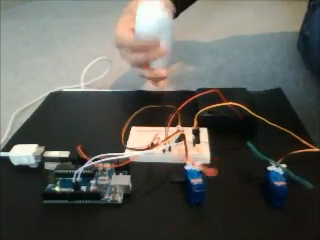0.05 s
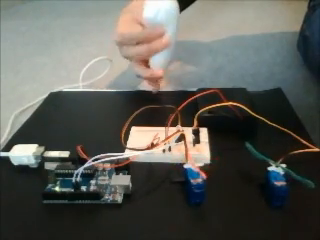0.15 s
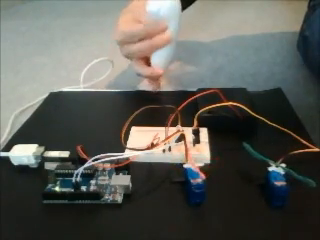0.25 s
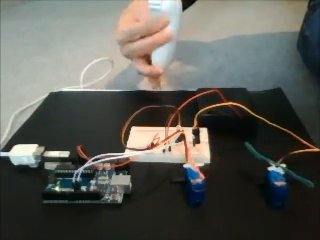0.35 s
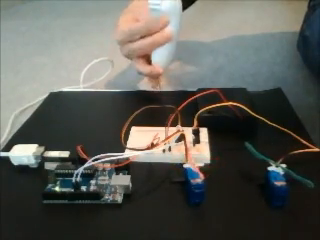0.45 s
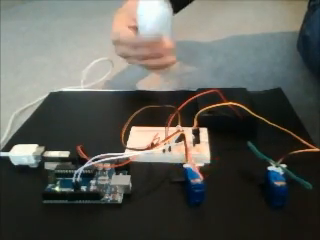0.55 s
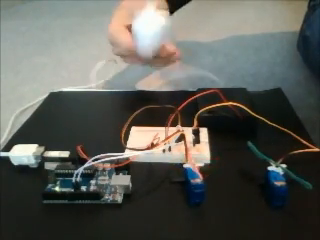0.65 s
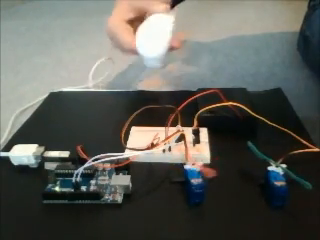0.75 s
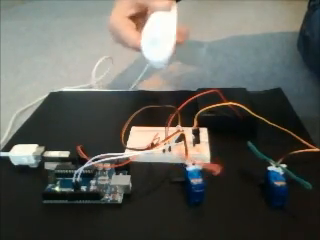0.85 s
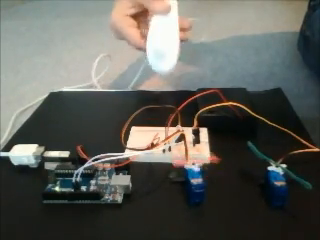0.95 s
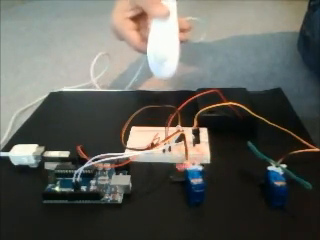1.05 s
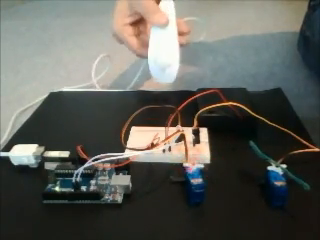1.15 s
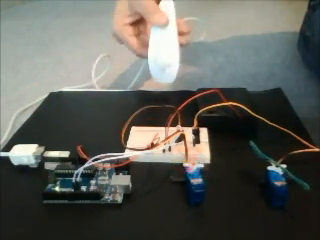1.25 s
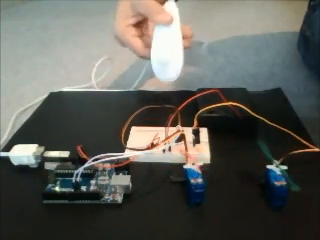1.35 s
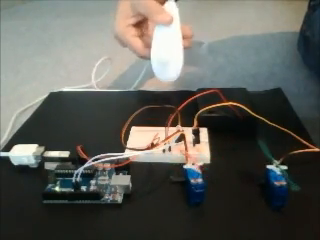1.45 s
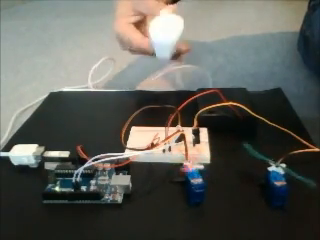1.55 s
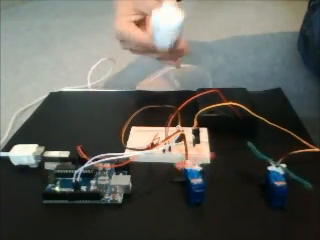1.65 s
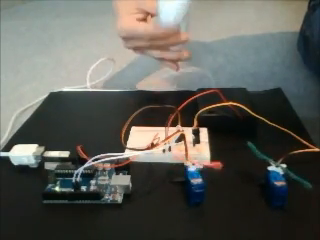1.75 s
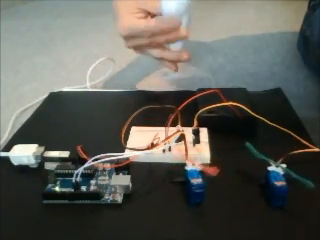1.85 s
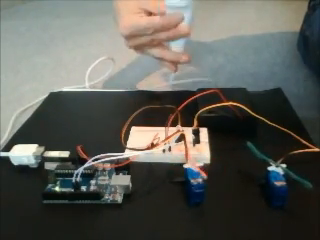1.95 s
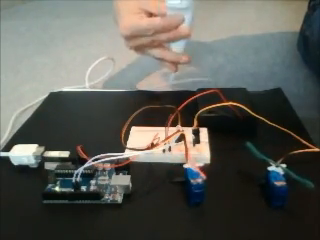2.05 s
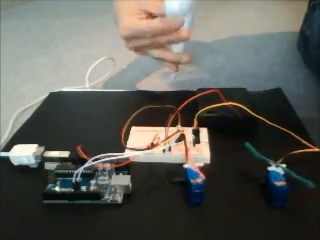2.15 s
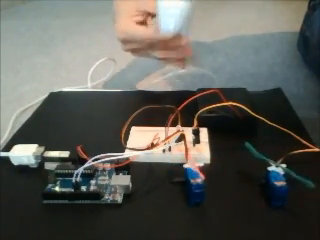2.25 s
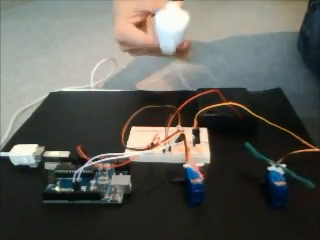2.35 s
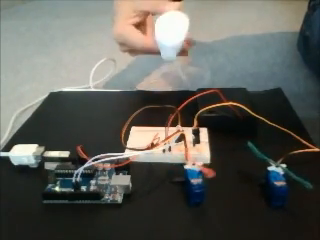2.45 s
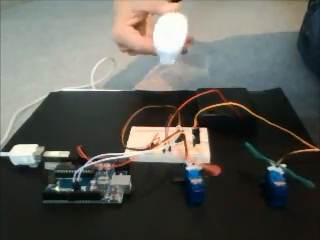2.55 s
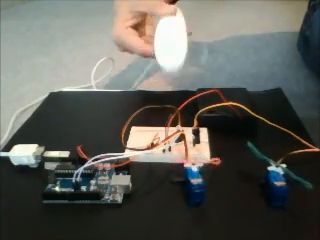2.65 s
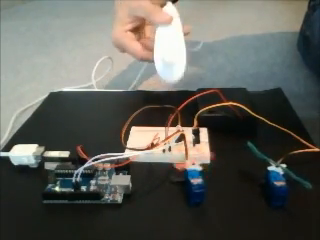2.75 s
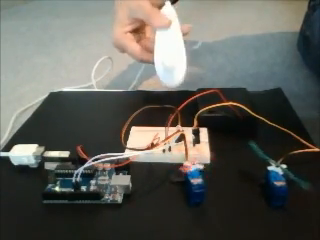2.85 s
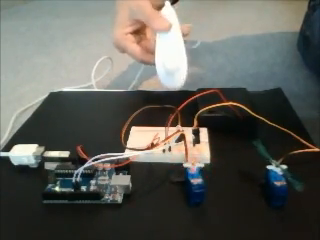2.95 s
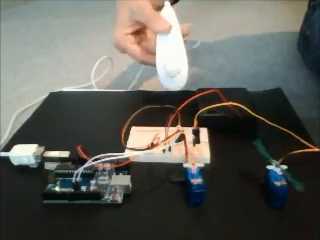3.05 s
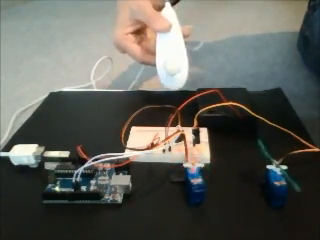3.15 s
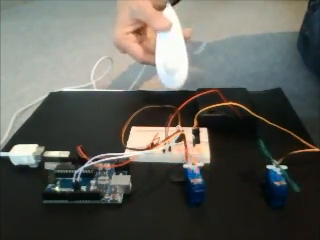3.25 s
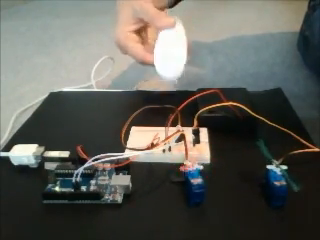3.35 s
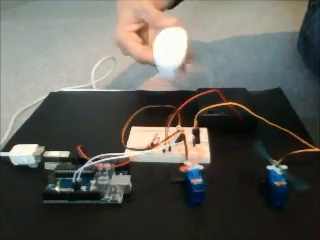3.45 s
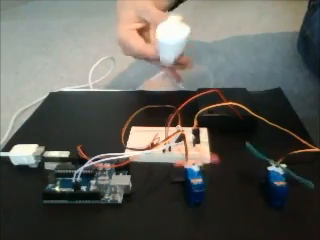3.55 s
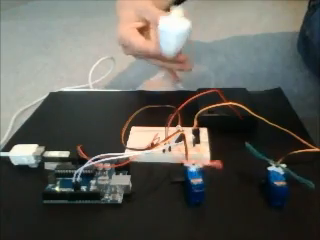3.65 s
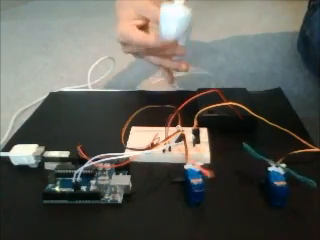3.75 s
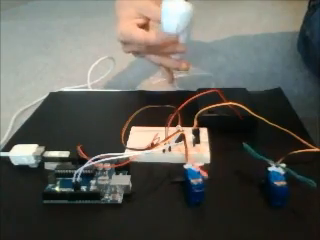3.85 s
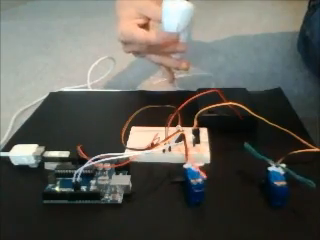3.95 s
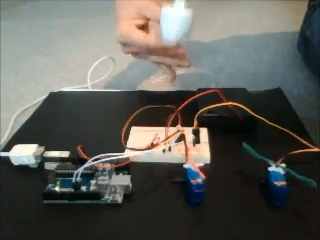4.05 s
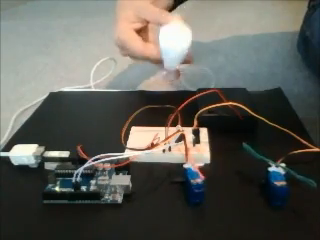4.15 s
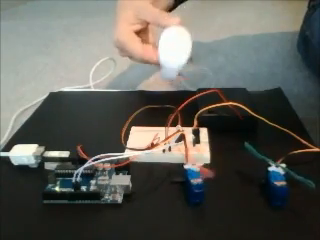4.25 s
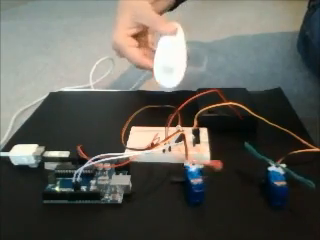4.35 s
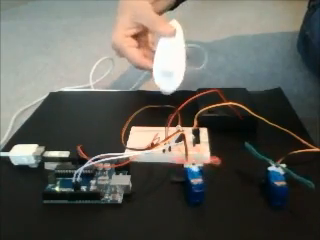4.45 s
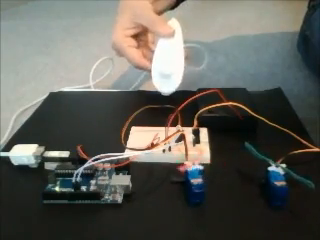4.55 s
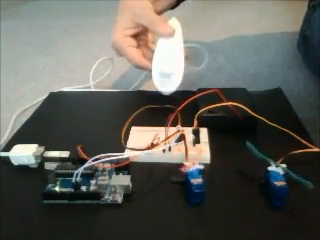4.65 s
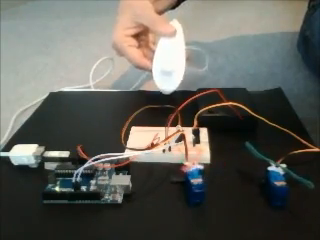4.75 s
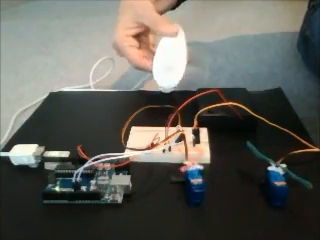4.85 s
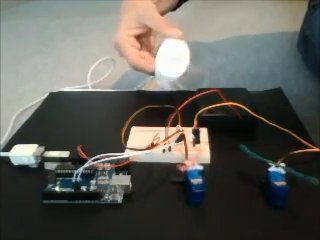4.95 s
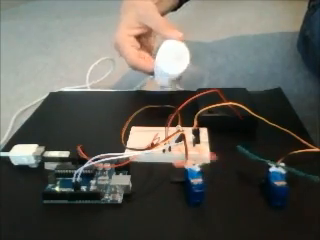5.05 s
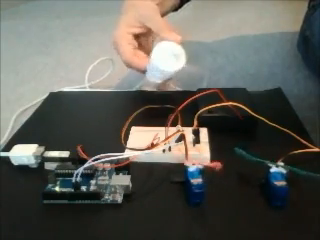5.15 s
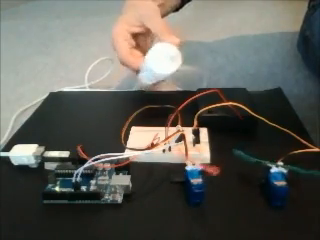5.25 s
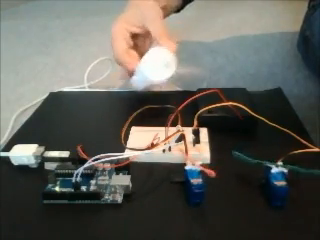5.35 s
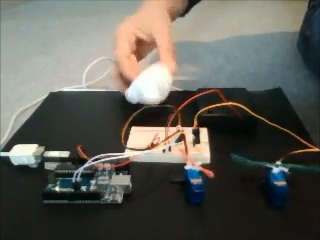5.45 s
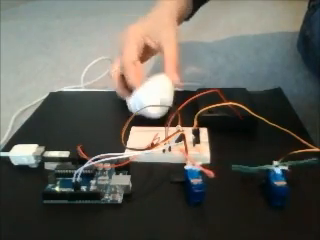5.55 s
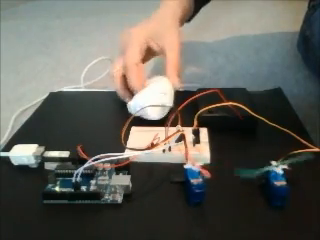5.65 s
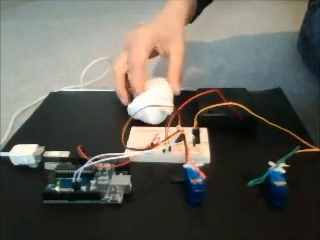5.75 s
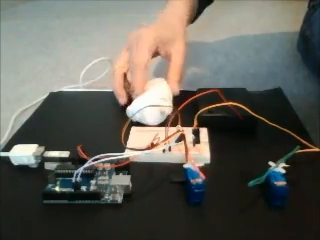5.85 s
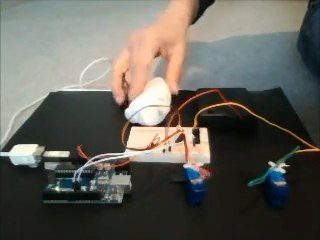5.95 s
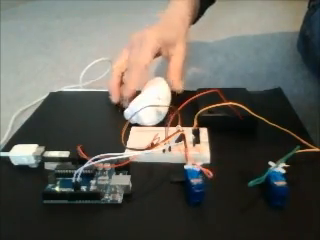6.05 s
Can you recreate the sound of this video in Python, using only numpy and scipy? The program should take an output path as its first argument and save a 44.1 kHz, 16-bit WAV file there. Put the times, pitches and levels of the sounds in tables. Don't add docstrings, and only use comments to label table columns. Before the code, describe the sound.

Close, dry, mono sound of two little hobby servos on a bench, with dull highs cut off and a low, faint room hum. The tail of a loud whir ends by 0.1 s; then quiet with tiny twitches and faint fifty-per-second ticking. From 0.7 to 1.3 s the gears buzz in a long whine and shorter, rougher ones; a strong steady whine runs 1.45-1.87 s. A near-silent pause with small ticks follows until 2.35 s. Stuttering zips fill 2.35-2.9 s, then 3.0-3.75 s is busier and louder, with sharp little thumps. After another rest, bursts return at 4.2-4.9 s, with the brightest, hardest whine at 4.9-5.2 s. Brief, weaker chirps come at 5.4 and 5.6 s, and a last short zip at 5.9-6.1 s. Each burst has a midrange motor tone, gritty grinding and a high plastic ring.

```python
import sys
import numpy as np
from scipy import signal
from scipy.fft import rfft, irfft, next_fast_len
from scipy.io import wavfile
from scipy.ndimage import uniform_filter1d

SR = 44100
rng = np.random.default_rng(int(sys.argv[2]) if len(sys.argv) > 2 else 0)


def log_audio(samples):
    frames = np.atleast_2d(samples).T
    limited = np.clip(frames, -1, 1)
    pcm = np.round(limited * 32767).astype(np.int16)
    wavfile.write(sys.argv[1], SR, pcm)


def ratio_of_db(decibels):
    return 10 ** (np.asarray(decibels, float) / 20)


N = 268569

TOP_SPEED_HZ = 778
PULSES_PER_S = 50
STEP = 21

# [f/Hz, level/dB per Hz]
SOFT_WHINE = [(3410, -18.5), (5800, -42), (6540, 0.5), (6770, 6), (7110, 8.5), (7510, 9.5), (7680, -15),
              (8070, -39), (8400, -58), (10900, -72), (18500, -120)]
# [f/Hz, level/dB per Hz]
FAST_GRIND = [(1000, -75.5), (1300, -38), (2300, -16), (2550, -21), (3050, -10), (3520, -19), (3900, -16.5),
              (4600, -5), (5200, -7.5), (6400, 0.5), (7500, -29.5)]


def evened(x):
    return x / np.sqrt(np.mean(x ** 2) + 1e-20)


def coloured(x, points):
    f, db = np.transpose(points)
    size = next_fast_len(N)
    hz = np.fft.rfftfreq(size, 1 / SR)
    gain = ratio_of_db(np.interp(np.log(hz + 1), np.log(f), db, -120, -120))
    return evened(irfft(rfft(x, size) * gain, size)[:N])


def ringing(x, modes, direct):
    size = next_fast_len(N)
    hz = np.fft.rfftfreq(size, 1 / SR)
    gain = sum(ratio_of_db(db) / (1 + (2 * (hz - mode_hz) / width) ** 2) for mode_hz, width, db in modes)
    return evened(irfft(rfft(x, size) * (direct + gain), size)[:N])


def drift(seconds):
    size = max(round(seconds * SR), 1)
    once = uniform_filter1d(rng.standard_normal(N), size)
    return evened(uniform_filter1d(once, size))


def chatter(depth_db):
    return rng.standard_normal(N) * ratio_of_db(depth_db * drift(0.0025))


def patchy(x, depth_db):
    z = signal.stft(x, nperseg=256)[2]
    patches = rng.standard_normal(z.shape[::-1])
    patches = uniform_filter1d(patches, size=9, axis=0)
    patches = uniform_filter1d(patches, size=3, axis=1)
    z = z * ratio_of_db(depth_db * evened(patches).T)
    return evened(signal.istft(z, nperseg=256)[1][:N])


def drive_pulses():
    first_s = .453
    return (np.arange(N) / SR - first_s) * PULSES_PER_S + 100


def motor():
    # [on/s, stop/s, aimed tooth rate f/Hz, tone level/dB re the rule]
    swings = [(-0.046, 0.074, 802.4, -2), (0.692, 0.95, 778.1, 0.0), (0.86, 1.058, 766.7, 1),
              (1.189, 1.308, 567.4, -3), (1.465, 1.895, 781, -2), (2.48, 2.595, 775.5, 1),
              (2.653, 2.835, 753, 0.5), (3.22, 3.381, 766.2, -2), (3.435, 3.554, 790.3, -2),
              (3.49, 3.699, 778, -2), (3.633, 3.777, 792.7, -2), (4.174, 4.357, 771, 0.0),
              (4.387, 4.56, 765, 1), (4.898, 5.116, 777, -2), (5.117, 5.25, 774.6, -2),
              (6.05, 6.165, 617, 0.5)]
    # [on/s, stop/s, aimed tooth rate f/Hz, tone level/dB re the rule]
    nudges = [(1.028, 1.129, 646, -4), (1.11, 1.172, 752, 1), (1.33, 1.385, 563.1, -24),
              (1.395, 1.487, 598, -2), (2.351, 2.451, 685, -0.5), (2.423, 2.509, 762, 1),
              (2.544, 2.624, 673, -2.5), (2.771, 2.876, 776, 1), (3.016, 3.091, 765, -3.5),
              (3.075, 3.153, 687, -0.5), (3.149, 3.252, 567, -0.5), (3.376, 3.421, 770, -5.5),
              (4.291, 4.398, 781, 0.5), (4.595, 4.688, 747, 1), (4.682, 4.782, 768, -2),
              (4.808, 4.884, 653, -2), (5.404, 5.471, 607, -11.5), (5.473, 5.508, 806.5, -13),
              (5.561, 5.611, 793, 0.5), (5.919, 5.996, 607, -1.5)]
    # [tooth rate f/Hz, level/dB]
    tone_rule = [(300, -50.5), (450, -47), (550, -38.5), (630, -33.5), (720, -32.5), (780, -32.5)]
    creep_hz, spin_up_s, brake_s, run_out_s = 300.7, .0099, .0147, .0014
    stutter_db, stutter_pitch = 6, .06
    t = np.arange(0, N, STEP) / SR
    hz, tone_db = np.full(len(t), creep_hz), np.full(len(t), -100.)
    for on, stop, aim_hz, db in sorted(swings + nudges):
        spin_up = 1 - np.exp(-np.maximum(t - on, 0) / spin_up_s)
        brake = 1 - np.exp(-np.maximum(stop - t, 0) / brake_s)
        push = aim_hz * spin_up * brake
        still_silent = (tone_db < -99) & (t > on) & (t < stop + run_out_s)
        tone_db = np.where((push > hz) | still_silent, db, tone_db)
        hz = np.maximum(hz, push)
    hz, tone_db = np.repeat(hz, STEP)[:N], np.repeat(tone_db, STEP)[:N]
    slack = 1 - np.clip(hz / TOP_SPEED_HZ, 0, 1) ** 3
    tone_db = uniform_filter1d(tone_db + np.interp(hz, *np.transpose(tone_rule)), 133)
    tone_db = tone_db + stutter_db * slack * drift(0.0048)
    return hz * (1 + stutter_pitch * slack * drift(.006)), ratio_of_db(tone_db)


def rattling():
    # [from t/s, to t/s, first level/dB, last level/dB, grind/dB re the rule]
    rattles = [(0, 0.06, -13, -21, 2), (0.706, 1.08, -21, -19.4, 0.0), (1.124, 1.2, -18, -39, -1),
               (1.196, 1.302, -25, -25.5, 1.5), (1.416, 1.447, -18, -23, -0.5),
               (1.45, 1.492, -22.7, -22.5, 4.5), (1.49, 1.864, -14.5, -16.0, -1),
               (2.363, 2.606, -23.2, -20.6, 0.5), (2.664, 2.872, -20.5, -19.1, 0.5),
               (3.026, 3.141, -18.5, -24.5, 1), (3.161, 3.22, -23.5, -26.5, 1.5),
               (3.233, 3.356, -15.5, -15, 0.5), (3.444, 3.745, -15.0, -15, -2),
               (4.183, 4.376, -23, -20, 0.5), (4.397, 4.537, -20.5, -22.5, -0.5),
               (4.605, 4.659, -17, -26.5, 0.0), (4.634, 4.758, -28.5, -15, -1),
               (4.827, 4.853, -20.5, -25.5, -1), (4.906, 5.077, -16.5, -12.5, -2),
               (5.129, 5.222, -15, -16, -2.5), (5.406, 5.455, -25, -39, 2), (5.567, 5.717, -20.5, -38, 2),
               (5.922, 5.966, -30, -23.5, -3.5), (6.064, 6.096, -31, -17.5, -1)]
    # [t/s, length/s, whine level/dB, grind/dB re the rule]
    twitches = [(0.171, 0.021, -44, 3.5), (0.255, 0.0064, -29.5, -3), (0.285, 0.01, -46, -0.5),
                (0.397, 0.019, -33, -1.5), (1.336, 0.038, -26.0, -0.5), (1.914, 0.028, -36.5, 0.5),
                (1.993, 0.034, -47, 6.5), (2.073, 0.0016, -50.5, 2), (2.888, 0.018, -32, 1.5),
                (2.927, 0.11, -28, -3), (3.387, 0.11, -22.5, 3.5), (3.818, 0.027, -43, 2),
                (3.879, 0.021, -44, 1), (4.022, 0.036, -45.5, 7), (4.099, 0.018, -31.5, -4),
                (5.275, 0.017, -37.5, -5.5), (5.339, 0.032, -46.5, 6), (5.482, 0.027, -36.5, 5.5),
                (5.776, 0.032, -49.5, -2)]
    # [from t/s, to t/s, first level/dB, last level/dB, grind/dB re the rule]
    settling = [
        (5.724, 5.903, -57, -60.5, 6),
    ]
    rise_db_per_s, fall_db_per_s, sag_db_per_s = 2051, 1060, 132.5
    coast_db, coast_db_per_s = -22.5, 210.5
    t = np.arange(0, N, STEP) / SR
    power, extra = np.full(len(t), 1e-10), np.zeros(len(t))
    sagging = [(s, s + length, db, db - sag_db_per_s * length, grind_db)
               for s, length, db, grind_db in twitches]
    for start, end, first_db, last_db, grind_db in rattles + sagging + settling:
        after = np.maximum(t - end, 0)
        slope_db = np.interp(t, [start, end], [first_db, last_db])
        body = ratio_of_db(slope_db - rise_db_per_s * np.maximum(start - t, 0)) ** 2
        fall = ratio_of_db(-fall_db_per_s * after) ** 2
        coast = ratio_of_db(coast_db - coast_db_per_s * after) ** 2
        part = body * (fall + coast)
        power, extra = power + part, extra + grind_db * part
    whine_db = 10 * np.log10(power)
    grind_db = np.minimum(-11 - 0.54 * (whine_db + 20), -4.5) + extra / power
    return uniform_filter1d(np.repeat([whine_db, grind_db], STEP, axis=1)[:, :N], 133)


def case_whine(uneven, smooth, hard):
    # [multiple of tooth rate, level/dB]
    high_teeth = [(8, -8), (9, 2), (10, -24.5)]
    # [f/Hz, level/dB per Hz]
    hard_whine = [(3410, -66), (5800, -6), (5940, -25), (6020, -24.5), (6540, 3), (6750, 9.5), (7130, 9),
                  (7690, -11), (8400, -98), (10900, -76), (18500, -120)]
    high = evened(sum(ratio_of_db(db + 0.81 * drift(0.0085)) * np.cos(k * uneven + k * k) for k, db in high_teeth))
    knocking = chatter(1.0)
    ring = hard * coloured(knocking, hard_whine) + (1 - hard) * coloured(knocking, SOFT_WHINE)
    high_share = np.clip(0.1 + 0.45 * hard, 0, 1) * smooth ** 18
    return np.sqrt(high_share) * high + np.sqrt(1 - high_share) * ring


def tooth_grind(uneven, smooth, hard):
    # [multiple of tooth rate, gentle level/dB, hard level/dB]
    low_teeth = [(2, -10.5, -19), (3, 5, 0), (4, 9, -1), (5, 2, 4.5), (6, 11.5, 5.5), (7, -8, 15.5)]
    # [f/Hz, level/dB per Hz]
    slow_scrape = [(760, -69.5), (1300, -29), (1700, -23), (3680, -7), (5640, -7), (6400, -22),
                   (8320, -49.5), (14100, -120)]
    # [f/Hz, width/Hz, level/dB]
    shell = [(4550, 42, 3), (5330, 180, 3), (5850, 160, 6)]
    low = 0
    for k, gentle_db, hard_db in low_teeth:
        db = gentle_db + hard * (hard_db - gentle_db) + drift(0.017)
        low = low + ratio_of_db(db) * np.cos(k * uneven + k * k)
    low_share = .42 * smooth ** 13
    scrape = ringing(coloured(chatter(0.85), slow_scrape), shell, 0.34)
    rattle = np.sqrt(1 - smooth) * scrape + np.sqrt(smooth) * coloured(chatter(2.1), FAST_GRIND)
    return np.sqrt(low_share) * evened(low) + np.sqrt(1 - low_share) * patchy(rattle, 2.0)


def bench(shake):
    # [f/Hz, width/Hz, level/dB]
    bench_modes = [(247, 19, -14), (363, 87, -4), (640, 370, -8.5), (1050, 480, -15)]
    out = np.zeros(N)
    for hz, width, db in bench_modes:
        fit = ratio_of_db(3.5 * drift(.025)) * rng.standard_normal(N)
        out += ratio_of_db(db) * ringing(shake * fit, [(hz, width, 0)], 0)
    return out


def gears():
    off_centre = [(1 / 6, 0.093), (1 / 5, 0.16), (1 / 30, 0.05)]
    speed, tone_gain = motor()
    hz = uniform_filter1d(speed, 200) * (1 + 0.0026 * drift(0.0046))
    teeth = 2 * np.pi * np.cumsum(hz) / SR
    wobble = sum(depth * np.cos(turns * teeth + 2 * np.pi * rng.random()) for turns, depth in off_centre)
    smooth = np.clip(hz / TOP_SPEED_HZ, 0, 1)
    uneven = teeth + .06 * wobble + (1.04 - smooth) * 0.6 * drift(.002)
    whine_db, grind_db = rattling()
    hard = np.clip((uniform_filter1d(whine_db, 1500) + 21.5) / 11.0, 0, 1)
    tone = np.sqrt(2) * np.cos(teeth) * (1 + .35 * wobble) * tone_gain
    whine = case_whine(uneven, smooth, hard)
    grind = ratio_of_db(grind_db) * tooth_grind(uneven, smooth, hard)
    jerks = ratio_of_db(1.9 * (1 - smooth) * np.cos(2 * np.pi * (drive_pulses() - .25)))
    case = evened(1 + wobble) * jerks * ratio_of_db(whine_db) * (whine + grind)
    shake = ratio_of_db(whine_db + grind_db) * (1 - 0.52 * smooth ** 18)
    return tone + case + ratio_of_db(-50.5) * bench(shake)


def ticks():
    tick_db, jolt_t60_s = -59.5, 0.022
    pulse = drive_pulses()
    size_db = 1.4 * rng.standard_normal(500)[pulse.astype(int)]
    since_s = (pulse % 1) / PULSES_PER_S
    jolt = uniform_filter1d(ratio_of_db(size_db - 60 * since_s / jolt_t60_s), 60)
    burst = coloured(jolt * rng.standard_normal(N), SOFT_WHINE)
    case = ringing(burst, [(7340, 450, 9.2)], 0.76)
    teeth = coloured(jolt * rng.standard_normal(N), FAST_GRIND)
    return ratio_of_db(tick_db) * (case + ratio_of_db(-11.5) * teeth)


def hum():
    # [f/Hz, level/dB per Hz]
    floor = [(53, -36), (90, -30.5), (124, 0), (314, 5.5), (575, -6.5), (3470, -15.5), (6020, -17.5),
             (7270, -22.5), (7690, -17.5), (8300, -58.5), (10800, -81), (18300, -120)]
    return ratio_of_db(-60.5 + 0.61 * drift(0.1)) * coloured(rng.standard_normal(N), floor)


def holding():
    # [from t/s, to t/s, f/Hz, level/dB]
    whistles = [(0.027, 0.039, 1247, -34), (0.027, 0.035, 1684, -26.5), (0.397, 0.436, 2890, -62),
                (3.24, 3.476, 1073, -58.5), (3.8, 3.86, 3700, -56), (1.188, 1.358, 943, -60.5),
                (1.43, 1.603, 1050, -54), (4.665, 4.726, 1039, -60), (5.401, 5.487, 1065, -60.5),
                (5.548, 5.7, 1022, -56), (5.705, 5.814, 3926, -56), (5.405, 5.519, 5597, -39),
                (5.624, 5.713, 5704, -33)]
    width, edge_s = .06, .008
    t = np.arange(N) / SR
    out = np.zeros(N)
    for start, end, hz, db in whistles:
        fade = np.clip(np.minimum(t - start, end - t) / edge_s, 0, 1)
        out += ratio_of_db(db) * fade * ringing(rng.standard_normal(N), [(hz, width * hz, 0)], 0)
    return out


def knocks():
    # [t/s, peak level/dB, f/Hz]
    thumps = [(0.042, -32.5, 361), (0.072, -33.5, 224), (0.701, -36.5, 364), (0.758, -38, 320),
              (1.164, -34, 324), (1.468, -35, 399), (1.505, -40.5, 233), (1.874, -37, 268),
              (2.357, -38, 353), (2.874, -28.5, 331.5), (3.018, -40.5, 405.4), (3.134, -40, 312.4),
              (3.222, -37.5, 393), (3.36, -29, 326), (3.407, -32.5, 376.7), (3.437, -34, 351.6),
              (3.474, -41.5, 390), (3.552, -40.5, 338), (3.753, -31, 363), (3.791, -43.5, 336),
              (4.183, -43, 375.8), (4.387, -33.5, 371.8), (4.542, -34.5, 381.6), (4.899, -34.5, 366),
              (5.263, -36.5, 320), (5.403, -38.5, 272), (5.473, -39, 310), (5.562, -35.5, 361),
              (5.599, -32.5, 260.8), (5.92, -37, 296.8)]
    rise_s, t60_s, lead_s = 0.0072, 0.056, .005
    out, t = np.zeros(N), np.arange(SR // 10) / SR
    for s, db, hz in thumps:
        envelope = ratio_of_db(db + 9.5 - 60 * t / t60_s) * (1 - np.exp(-t / rise_s))
        thump = envelope * np.sin(2 * np.pi * hz * t)
        part = out[round((s - lead_s) * SR):][:len(t)]
        part += thump[:len(part)]
    return out


def room(x):
    t = np.arange(SR // 4) / SR
    sparse = (rng.random(len(t)) < .05) * (t > .003)
    taps = rng.choice([-1., 1.], len(t)) * sparse * ratio_of_db(-60 * t / 0.08)
    return signal.fftconvolve(x, taps / np.linalg.norm(taps))[:N]


def scene():
    servos = gears() + holding() + ticks() + knocks()
    return np.tile(servos + ratio_of_db(-12) * room(servos) + hum(), (2, 1))


def top_cut(x):
    return signal.sosfilt(signal.butter(12, 8780, fs=SR, output="sos"), x)


def record(dry):
    band = signal.firwin(4095, [112, 8300], pass_zero=False, window=("kaiser", 6), fs=SR)
    return top_cut(signal.oaconvolve(dry, band[None], "same"))


dry = scene()
out = record(dry)
log_audio(out)
```